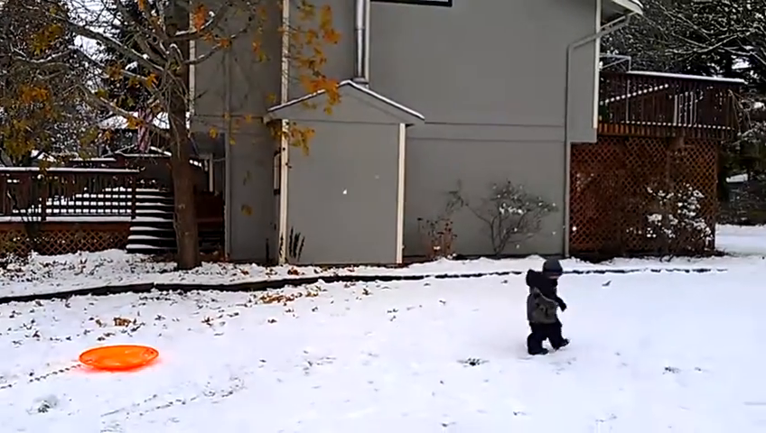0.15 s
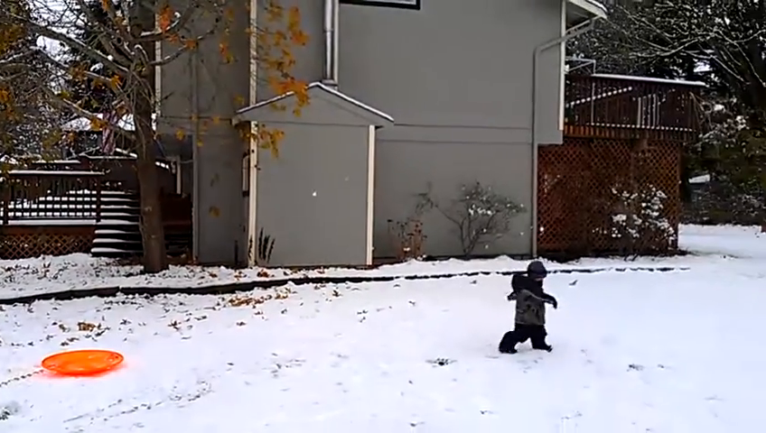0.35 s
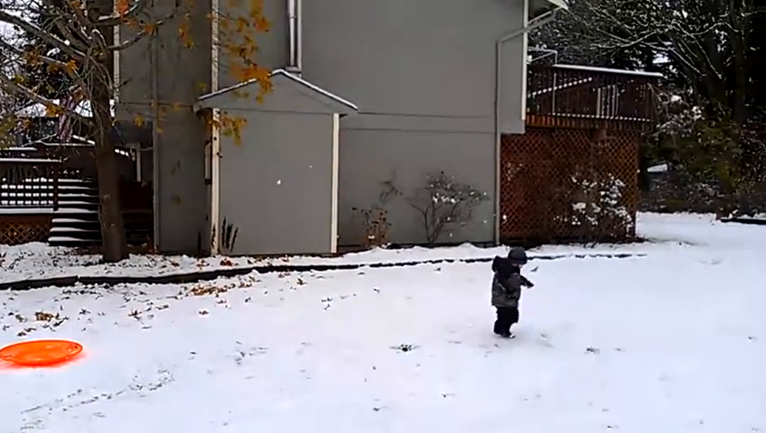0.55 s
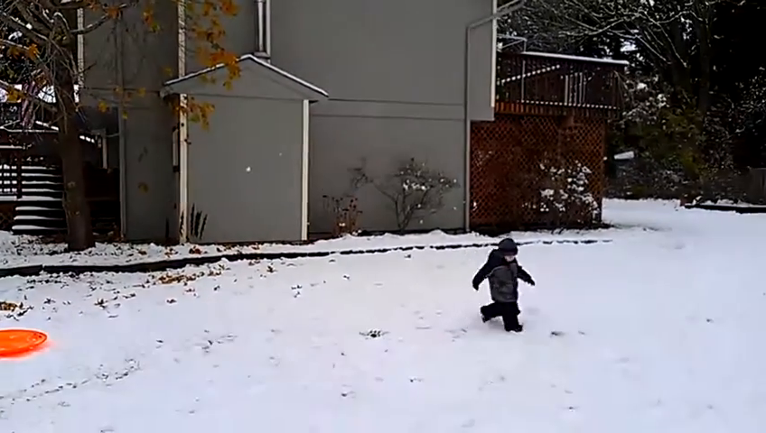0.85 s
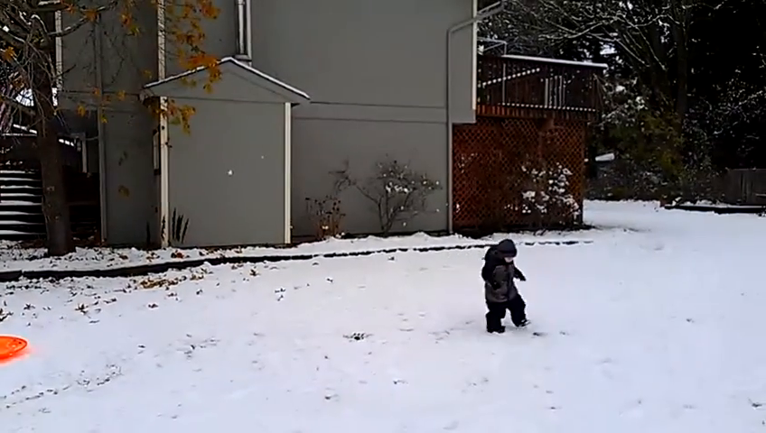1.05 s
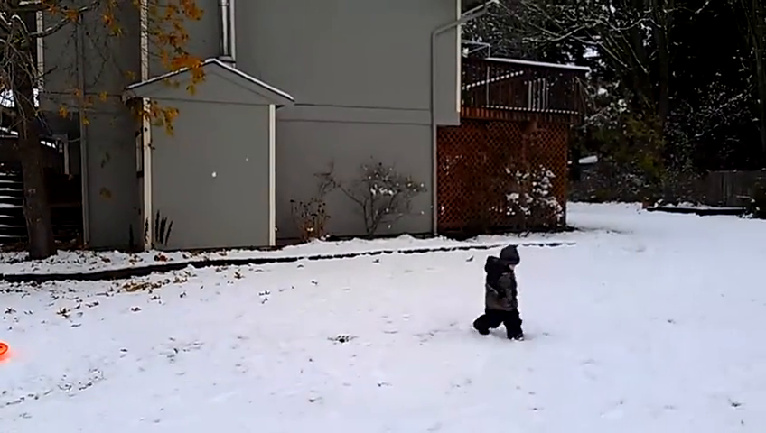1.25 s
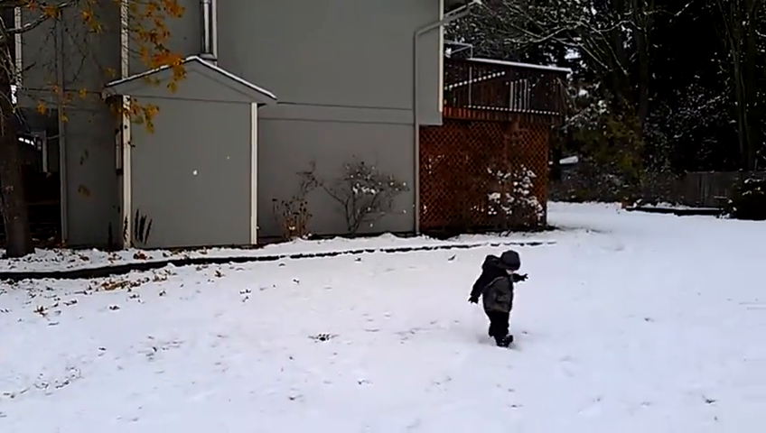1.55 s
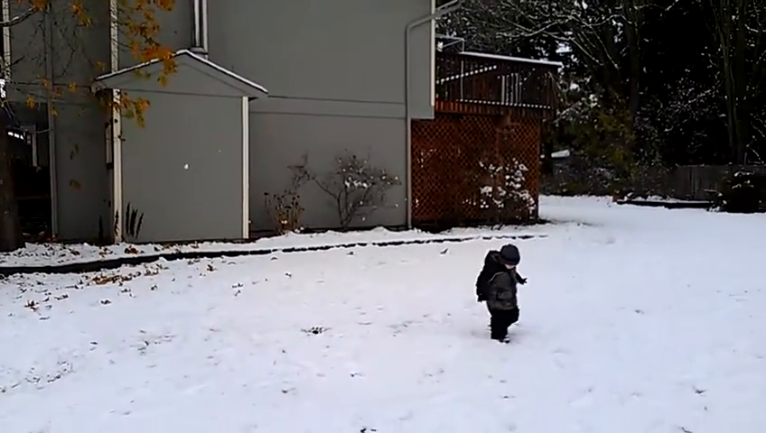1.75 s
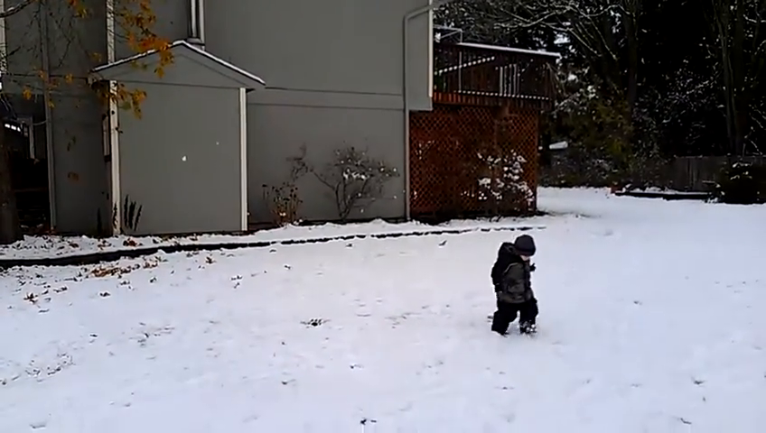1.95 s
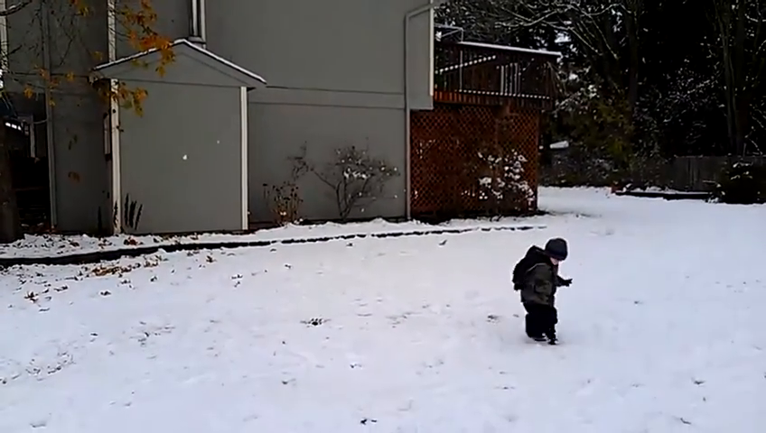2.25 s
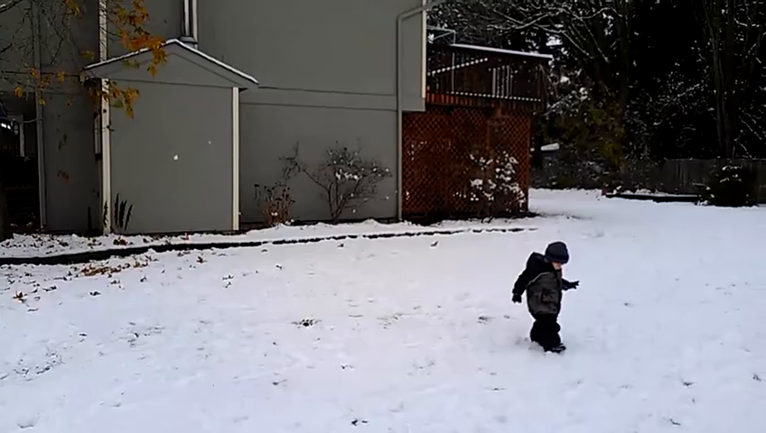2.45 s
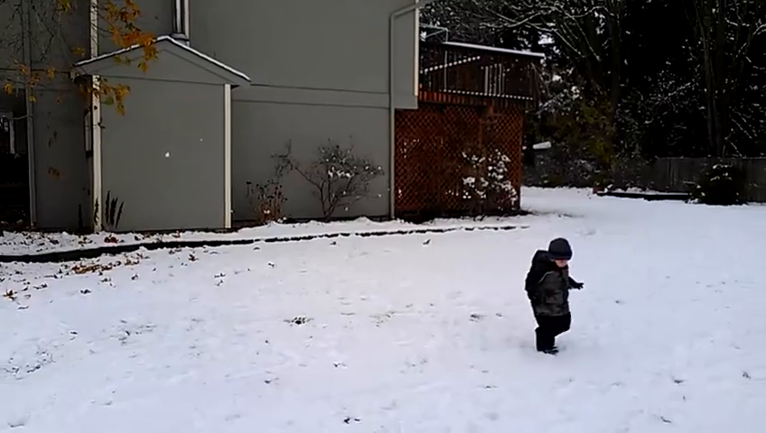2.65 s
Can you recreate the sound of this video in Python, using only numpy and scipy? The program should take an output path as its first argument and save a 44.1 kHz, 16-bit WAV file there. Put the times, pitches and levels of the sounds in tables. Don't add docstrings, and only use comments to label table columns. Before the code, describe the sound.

A small child's boots crunch unevenly through thin crusty snow in a quiet open yard.

```python
import sys
import numpy as np
from scipy import signal
from scipy.fft import rfft, irfft, next_fast_len
from scipy.io import wavfile
from scipy.ndimage import uniform_filter1d, map_coordinates

SR = 44100
rng = np.random.default_rng(int(sys.argv[2]) if len(sys.argv) > 2 else 0)


def how_loud(loudness_db):
    steps = np.asarray(loudness_db, float) / 20
    return 10 ** steps


def wav_out(sig):
    wavfile.write(sys.argv[1], SR, np.round(np.clip(np.atleast_2d(sig).T, -1, 1) * 32767).astype(np.int16))


N = 123479


def unit(x):
    return x / np.sqrt(np.mean(x ** 2) + 1e-20)


def along(points, hz):
    point_hz, value = np.transpose(points)
    return np.interp(np.log(hz + 1), np.log(point_hz + 1), value)


def wobble(rate):
    knots = rng.standard_normal(int(N * rate / SR) + 4)
    return map_coordinates(knots, [np.arange(N) * rate / SR])


def filtered(x, response):
    size = next_fast_len(N + SR // 2)
    hz = np.fft.rfftfreq(size, 1 / SR)
    return irfft(rfft(x, size) * response(hz), size)[..., :N]


def spread(pair, spectrum):
    # frequency in Hz, likeness of left and right [-1 to 1].
    likeness = [(130, 0.62), (350, 0.87), (1600, 0.25), (3300, 0.62), (4200, 0.29), (6400, 0.52),
                (8200, 0.55), (10800, 0.23)]

    def mid_side_response(hz):
        angle = np.arccos(np.clip(along(likeness, hz), -1, 1)) / 2
        return how_loud(along(spectrum, hz)) * np.array([np.cos(angle), np.sin(angle)])

    mid, side = filtered(pair, mid_side_response)
    return unit(np.array([mid + side, mid - side]))


def patchy(patchy_db, size):
    noise = signal.stft(rng.standard_normal((2, N)), nperseg=128)[2]
    field = uniform_filter1d(rng.standard_normal(noise.shape[1:]), 3, 0)
    field = uniform_filter1d(field, size, 1)
    return unit(signal.istft(noise * how_loud(patchy_db * unit(field)), nperseg=128)[1][:, :N])


def add_at(out, start_s, sound):
    start = round(start_s * SR)
    out[start:start + len(sound)] += sound


def yard():
    # frequency in Hz, level in dB per Hz.
    hum_spectrum = [(71, -89), (120, -48), (221, -17), (436, -13), (498, -14.5), (709, -7.5), (1150, -15.5),
                    (1240, -16.5), (2200, -15), (2860, -48), (4840, -120)]
    # frequency in Hz, level in dB per Hz.
    hiss_spectrum = [(760, -46), (1300, -15.5), (1620, -6), (1950, -3.5), (3110, -7.5), (3360, -5),
                     (7430, -4.5), (11300, -18.5), (13900, -47)]
    hum_db, hiss_db = -57.5, -55.5
    drift_db = 0.5 * wobble(2.56)
    hum = how_loud(hum_db + drift_db) * spread(patchy(patchy_db=1, size=30), hum_spectrum)
    hiss = how_loud(hiss_db + drift_db) * spread(patchy(patchy_db=0.7, size=20), hiss_spectrum)
    return hum + hiss


def ticks():
    # start in seconds, peak in dB, pitch in Hz, 60 dB decay in seconds.
    tick_table = [(.2748, -41, 380, .02), (.7115, -37, 570, .02), (.7355, -45, 520, .025),
                  (2.185, -49, 290, .035), (2.699, -52, 400, .025), (1.740, -48, 750, .025),
                  (1.266, -49, 600, .025), (.955, -51, 400, .025)]
    out, t = np.zeros(N + SR), np.arange(SR // 10) / SR
    for start_s, db, hz, t60 in tick_table:
        decay_db = -60 * t / t60
        body = np.sin(2 * np.pi * hz * t)
        edge = sum(how_loud(-3.5 + decay_db) * np.sin(2 * np.pi * ratio * hz * t) for ratio in (1.45, 2.86))
        onset = 1 - np.exp(-t / 0.0011)
        add_at(out, start_s, how_loud(db + 4.5 + decay_db) * (body + edge) * onset)
    return out[:N]


def drags():
    # start in seconds, length in seconds, first pitch in Hz, last pitch in Hz, level in dB.
    drag_table = [(1.42, 0.095, 920, 5500, -50.5), (.99, 0.087, 1900, 2700, -56.5),
                  (0.67, 0.095, 7600, 1800, -56), (0.377, 0.11, 2000, 3100, -51)]
    width_octaves = 0.65
    hz, t, noise = signal.stft(rng.standard_normal((2, N)), SR, nperseg=256)
    gain = 0
    for start_s, length_s, from_hz, to_hz, db in drag_table:
        done = np.clip((t - start_s) / length_s, 0, 1)
        centre = from_hz * (to_hz / from_hz) ** done
        octaves_off = np.log2((hz[:, None] + 1) / centre)
        band = np.exp(-(octaves_off / width_octaves) ** 2 / 2)
        even_power = np.sqrt(SR / 2 / (width_octaves * centre))
        gain = gain + how_loud(db) * np.sin(np.pi * done) * band * even_power
    a, b = signal.istft(noise * gain, SR, nperseg=256)[1][:, :N]
    return np.array([a + 0.55 * b, a - 0.67 * b])


def squeaks():
    # start in seconds, length in seconds, pitch in Hz, glide in Hz, level in dB.
    squeak_table = [(1.452, .024, 3050, -60, -42), (1.474, 0.0078, 3250, -66, -35.5),
                    (1.2, .016, 1500, -87, -50)]
    out, t = np.zeros(N + SR), np.arange(SR // 10) / SR
    for start_s, length_s, hz, glide_hz, db in squeak_table:
        done = np.clip(t / length_s, 0, 1)
        swell = np.sin(np.pi * done) ** 0.72
        tone = np.sin(2 * np.pi * (hz + glide_hz * done / 2) * t)
        add_at(out, start_s, how_loud(db) * swell * tone)
    return out[:N]


def snaps():
    # start in seconds, peak in dB.
    snap_table = [(1.1233, -24), (1.4843, -31), (1.99, -29), (1.625, -38), (2.274, -42), (2.701, -42)]
    out, t = np.zeros(N + SR), np.arange(SR // 10) / SR
    for start_s, db in snap_table:
        add_at(out, start_s, how_loud(db - 6 - 60 * t / 0.0016) * np.sin(2 * np.pi * 4500 * t))
    return out[:N]


def clumps():
    # time of the peak in seconds, peak in dB, pitch in Hz.
    clump_table = [(.216, -39, 6400), (.357, -40, 3200), (.617, -43, 3500), (.616, -41, 6500),
                   (1.112, -29, 6300), (1.12, -31, 2500), (1.1435, -27, 6200), (1.153, -28, 6300),
                   (1.965, -33, 6300), (1.99, -34, 6000), (2.035, -36, 3300), (2.183, -36, 6200),
                   (2.093, -37, 6100), (2.185, -40, 8000), (2.363, -42, 2400), (2.364, -43, 6000),
                   (2.505, -46, 3400), (1.133, -32, 3600), (.418, -37, 3000), (1.498, -36, 5600)]
    half, width_s = 441, 0.0017
    out, t = np.zeros((2, N)), np.arange(-half, half) / SR
    wander = 1.3 * np.array([wobble(700), wobble(700)])
    swell = np.exp(-(t / width_s) ** 2 / 2)
    for peak_s, db, hz in clump_table:
        middle = round(peak_s * SR)
        at = slice(middle - half, middle + half)
        out[:, at] += how_loud(db - 3) * swell * np.sin(2 * np.pi * hz * t + wander[:, at])
    return out


def crackle():
    grains_per_s, size_db, grain_share = 4000, 2.5, 0.3
    breaks = rng.random(N) < grains_per_s / SR
    size = np.minimum(rng.exponential(1, N), 5)
    sign = np.sign(rng.standard_normal((2, N)))
    grains = unit(breaks * how_loud(size_db * size) * sign)
    bed = patchy(patchy_db=1.0, size=4)
    return np.sqrt(grain_share) * grains + np.sqrt(1 - grain_share) * bed


def pressure(lag_s, bright):
    # time in seconds, level in dB, rise in seconds, fall in seconds, fine over coarse in dB.
    tread_table = [(.02, -57, 0.021, 0.018, 1), (.215, -51, 0.041, 0.055, -0.5),
                   (0.366, -46.5, 0.047, 0.045, 0), (0.418, -47, 0.032, .06, -3.5),
                   (.615, -52.5, 0.013, .02, -3.5), (0.682, -51, 0.053, 0.069, 2),
                   (1.19, -49, 0.035, 0.058, -1), (0.849, -50, 0.053, 0.034, -3),
                   (1.02, -54.5, 0.064, 0.06, -1), (1.123, -40.5, 0.027, 0.025, 3),
                   (1.151, -44.5, 0.016, 0.017, 3), (1.319, -51, 0.037, 0.047, 1),
                   (1.475, -48, 0.042, .012, -2), (1.494, -43.5, 0.017, .02, 2.5),
                   (1.549, -50.5, 0.06, 0.077, -0.5), (1.958, -44.5, 0.017, 0.046, 3),
                   (2.041, -42.5, 0.031, 0.027, -1.5), (2.085, -50, 0.018, 0.035, 1),
                   (2.181, -51, 0.0087, 0.013, 2.5), (2.3, -56.5, 0.053, 0.12, 5),
                   (2.37, -60.5, 0.027, 0.06, 2.5), (2.508, -54, 0.012, 0.019, 4),
                   (2.601, -55, 0.035, 0.034, 1.5), (2.8, -50.5, 0.0097, 0.017, 4.5)]
    start_s, db, rise_s, fall_s, fine_db = np.transpose(tread_table)[..., None]
    t = np.arange(0, N / SR + 0.001, 0.001)
    since = t - start_s - lag_s
    rising = np.exp(np.clip(-since / rise_s, -50, 50))
    falling = np.exp(np.clip(since / fall_s, -50, 50))
    treads = how_loud(db + bright * fine_db) * 2 / (rising + falling)
    return np.interp(np.arange(N) / SR, t, np.sqrt(np.sum(treads ** 2, axis=0)))


def snow():
    # frequency in Hz, level in dB per Hz.
    coarse_spectrum = [(410, -46), (700, -15), (907, -8), (980, -14.5), (2020, -5), (2220, -4.5),
                       (5500, -6), (7150, -65), (12100, -120)]
    # frequency in Hz, level in dB per Hz.
    fine_spectrum = [(2650, -39), (4500, -9.5), (5610, -7.5), (6080, -3), (8300, -4), (10500, -21),
                     (10800, -40), (11800, -24.5), (13900, -30.5)]
    slip_db = 0.83 * wobble(70.5) + 1.1 * wobble(190)
    coarse = pressure(lag_s=0, bright=0) * spread(crackle(), coarse_spectrum)
    fine = pressure(lag_s=0.003, bright=1) * spread(crackle(), fine_spectrum)
    return how_loud(slip_db) * (coarse + fine)


def scene():
    return yard() + ticks() + drags() + squeaks() + snaps() + clumps() + snow()


def low_pass(x):
    return signal.sosfilt(signal.butter(12, 14020, fs=SR, output="sos"), x)


def record(dry):
    # frequency in Hz, gain in dB.
    bass_cut = [(90, -55), (150, -9), (200, -12), (260, 0.0)]
    # frequency in Hz, left over right in dB.
    left_over_right = [(130, -5), (300, 4.5), (1000, 3.5), (3600, 5.5), (4400, 3), (6000, 0.5), (7200, 1.5),
                       (10000, 5.5)]
    # frequency in Hz, lead of the left in radians.
    left_lead = [(3700, 0.06), (4400, -1.5), (5000, -3.14), (5800, -1.2), (6800, 2), (8200, -0.4),
                 (10200, -0.5), (11800, 7)]
    port_hz, port_width_hz, port_db = 6500, 320, 2
    self_db, self_spectrum = -88.5, [(15, -7.5), (45, -16), (100, -33.5), (200, -27)]
    side = np.array([[0.5], [-0.5]])

    def port_response(hz):
        ring_db = port_db / (1 + ((hz - port_hz) / port_width_hz) ** 2)
        level_db = along(bass_cut, hz) + ring_db + side * along(left_over_right, hz)
        return how_loud(level_db) * np.exp(1j * side * along(left_lead, hz))

    ports = filtered(dry, port_response)
    self_noise = filtered(rng.standard_normal((2, N)), lambda hz: how_loud(along(self_spectrum, hz)))
    return low_pass(ports + how_loud(self_db) * unit(self_noise))


dry = scene()
out = record(dry)
wav_out(out)
```